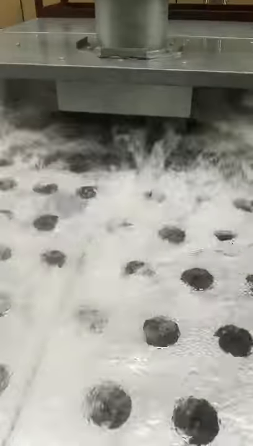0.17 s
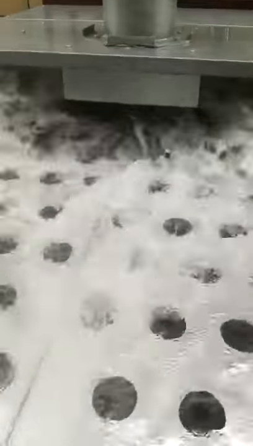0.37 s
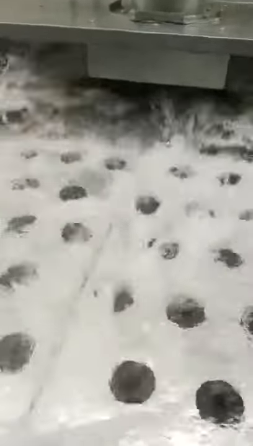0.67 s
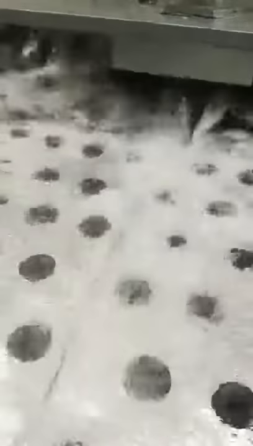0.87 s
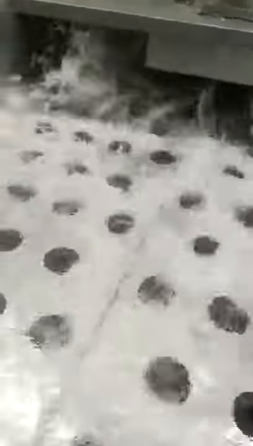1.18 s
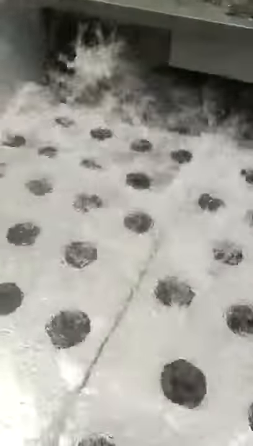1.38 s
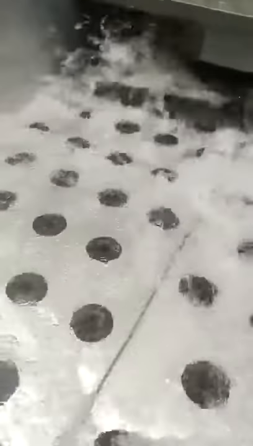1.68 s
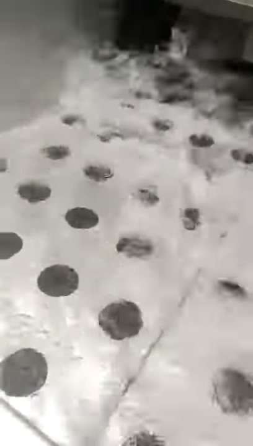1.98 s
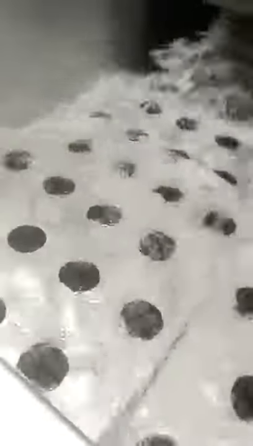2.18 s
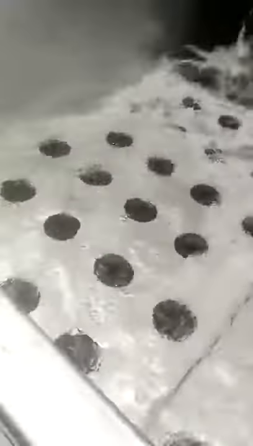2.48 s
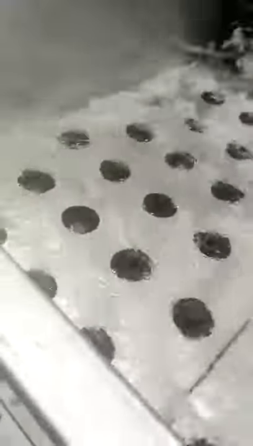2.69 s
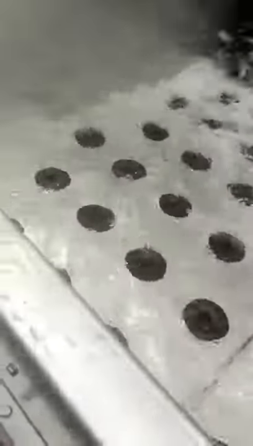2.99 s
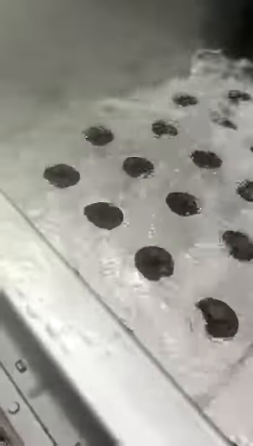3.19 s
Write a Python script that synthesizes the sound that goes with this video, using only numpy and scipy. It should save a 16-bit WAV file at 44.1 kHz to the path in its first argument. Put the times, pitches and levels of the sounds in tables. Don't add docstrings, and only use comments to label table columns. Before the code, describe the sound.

Turbulent water pours into a perforated metal basin, fading up quickly after a brief silence, then rushing steadily with foamy hiss, fizzing bubbles and low hollow rumble; close handheld stereo microphone, faint motor whine far off.

```python
import sys
import numpy as np
from scipy import signal
from scipy.fft import rfft, irfft, next_fast_len
from scipy.io import wavfile
from scipy.ndimage import uniform_filter1d

SR = 44100
rng = np.random.default_rng(int(sys.argv[2]) if len(sys.argv) > 2 else 0)


def makeup_ratio(level_db):
    decades = np.asarray(level_db, float) / 20
    return 10 ** decades


def wav_out(sig):
    wavfile.write(sys.argv[1], SR, np.round(np.clip(np.atleast_2d(sig).T, -1, 1) * 32767).astype(np.int16))


N = 147294

# [Hz, dB rms]
WHINE = [(4986.5, -62), (5090.7, -61), (5992, -63)]
# [s, dB]
CHURN = [(.45, -18.5), (.6, -16.5), (.8, -20), (1.0, -19.5), (1.15, -17), (1.3, -21), (1.55, -20),
         (1.75, -16), (1.95, -19.5), (2.2, -18.5), (2.38, -19), (2.55, -20.5), (2.8, -20.5), (3.0, -18),
         (3.33, -22.5)]
# [Hz, dB per Hz]
RUMBLE = [(20, -17), (34, -14), (44, -1), (68, -5.5), (130, -1.5), (185, -6.5), (340, -11.5), (500, -23)]
# [Hz, Hz, dB]
HOLLOW = [(84.4, 4.8, -28), (56, 8, -37), (138.9, 18, -33.5), (293.8, 19, -33.5), (254.3, 15.5, -36),
          (357, 14.6, -37.5)]
# [s, dB, Hz]
SPLASHES = [
    (.297, -23, 1500),
    (0.633, -27, 5200),
    (.752, -26, 4600),
    (1.859, -20.5, 3130),
]
# [s, dB]
FLOW = [(.45, 0.6), (.62, 1.6), (.7, 2), (.76, 0.9), (1.0, 1.5), (1.3, 1), (1.39, 1.6), (1.5, 1.1),
        (1.84, 0.7), (1.875, 3.7), (1.93, 1.1), (2.2, 0.44), (2.5, 0.6), (2.8, 0.9), (3.1, -0.2),
        (3.33, 1.4)]
# [Hz, dB per Hz]
LEFT_COLOUR = [(250, -4), (560, -1.5), (800, -5), (1520, 1.14), (2600, -8.5), (5300, -17.5), (9000, -14),
               (14400, -19.5)]
# [Hz, dB per Hz]
RIGHT_COLOUR = [(250, -14.5), (620, 0.5), (800, -4), (1300, -3), (2000, -10), (3600, -9.5), (6500, -14.5),
                (14400, -19.5)]
# [Hz, 0-1]
PORT_LIKENESS = [(300, 0.64), (620, 0.69), (800, 0.39), (1550, 0.6), (2250, 0.35), (3550, 0.33),
                 (4000, 0.04), (14400, 0.02)]
# [Hz, radians]
RIGHT_LEAD = [(250, 0), (620, 3.2), (1050, 6.7), (1750, 6.6), (2300, 9.2), (3800, 12.9), (5100, 21.3),
              (8200, 28)]

RUMBLE_DB, RUMBLE_LIKENESS, RUSH_DB = -19.5, 0.98, -23.5
FIZZ_FOLLOW, RUMBLE_FOLLOW = 0.95, 0.7
BUBBLES_PER_S, BUBBLE_SHARE, BUBBLE_SIZE_DB = 6000, 0.18, 2.5
LULLS_PER_S, LULL_DB = 45, -10
START_S, START_DB, FADE_S = 0.079, -20.5, 0.29


def evened(x):
    return x / np.sqrt(np.mean(x ** 2) + 1e-20)


def read(points, hz):
    f, value = np.transpose(points)
    return np.interp(np.log(hz + 1), np.log(f + 1), value)


def surge(curve, follow):
    s, db = np.transpose(curve)
    return makeup_ratio(follow * np.interp(np.arange(N) / SR, s, db - db.mean()))


def drift(low_hz, top_hz):
    t = np.arange(N) / SR
    waves = [np.sin(2 * np.pi * (f * t + rng.random())) / np.sqrt(f)
             for f in np.geomspace(low_hz, top_hz, num=24)]
    return evened(sum(waves))


def whine():
    t, out = np.arange(N) / SR, np.zeros(N)
    for hz, db in WHINE:
        level = makeup_ratio(db + 9 + 2.7 * drift(0.55, 3.2))
        out += level * np.sin(2 * np.pi * (hz * t + rng.random()))
    return out * makeup_ratio(np.array([[-6.0], [4.0]]))


def rumble():
    size = next_fast_len(N)
    hz = np.fft.rfftfreq(size, 1 / SR)
    common, spread = rfft(rng.standard_normal((2, N)), size)
    low_edge = np.minimum(hz / RUMBLE[0][0], 1) ** 2
    high_edge = np.minimum(RUMBLE[-1][0] / (hz + 1), 1) ** 4
    colour = makeup_ratio(read(RUMBLE, hz)) * high_edge * low_edge
    apart = np.sqrt(1 - RUMBLE_LIKENESS) * np.minimum(hz / 190, 2.2) * spread
    pair = irfft(colour * np.array([common + apart, common - apart]), size)[:, :N]
    out = makeup_ratio(RUMBLE_DB - 1.09) * evened(pair)
    for f, width, db in HOLLOW:
        ringing = rfft(rng.standard_normal(N), size) / (1 + (2 * (hz - f) / width) ** 2)
        out = out + makeup_ratio(db) * evened(irfft(ringing, size)[:N])
    return out * makeup_ratio(0.5 * drift(5, 13)) * surge(CHURN, RUMBLE_FOLLOW)


def blip(hz, cycles, glide):
    u = np.arange(0, 3 * cycles / hz, 1 / SR) * hz / cycles
    envelope = (1 - np.exp(-12 * u)) * np.exp(-2.5 * u)
    return evened(envelope * np.sin(2 * np.pi * cycles * (u + glide * u ** 2)))


def splashes():
    out, t = np.zeros(N + SR), np.arange(2000) / SR
    for start_s, db, hz in SPLASHES:
        at = round(start_s * SR)
        tone = blip(hz, 4.1, 0.05)
        out[at:at + len(tone)] += makeup_ratio(db - 2.0) * tone
        spray = np.diff(rng.standard_normal(len(t) + 1))
        out[at:at + len(t)] += makeup_ratio(db - 14.0 - 60 * t / 0.09) * spray
    return out[:N] * makeup_ratio(np.array([[-1.5], [1.5]]))


def bubbles():
    starts = rng.random((2, N)) < BUBBLES_PER_S / SR
    size = makeup_ratio(BUBBLE_SIZE_DB * np.minimum(rng.exponential(1, (2, N)), 5)) * starts
    kind, out = rng.integers(0, 30, (2, N)), np.zeros((2, N))
    for k, hz in enumerate(np.geomspace(450, 13000, num=30)):
        grain = blip(hz, 3.7 * rng.uniform(0.58, 1.2), 0.08)
        grain = grain[None] * hz / len(grain) ** 0.25 / 100
        out += signal.oaconvolve(size * (kind == k), grain, axes=1)[:, :N]
    return evened(out)


def foam(patchy_db, flicker_db):
    frames = N // 64 + 8
    a, b, c, d, patches = rng.standard_normal((frames, 129, 5)).T
    patches = uniform_filter1d(patches, size=5, axis=0)
    patches = evened(uniform_filter1d(patches, size=40, axis=1))
    flicker = rng.standard_normal((frames, 129)).T
    flicker = uniform_filter1d(flicker, size=70, axis=0)
    flicker = evened(uniform_filter1d(flicker, size=12, axis=1))
    z = np.array([a + 1j * b, c + 1j * d]) * makeup_ratio(patchy_db * patches + flicker_db * flicker)
    return evened(signal.istft(z, nperseg=256, noverlap=192)[1][:, :N])


def ports(pair):
    size = next_fast_len(N)
    hz = np.fft.rfftfreq(size, 1 / SR)
    direct, scattered = rfft(pair, size)
    same = np.clip(read(PORT_LIKENESS, hz), 0, 1)
    lead = np.exp(1j * np.interp(hz, *np.transpose(RIGHT_LEAD)))
    right = same * direct * lead + np.sqrt(1 - same ** 2) * scattered
    low_edge = np.minimum(hz / LEFT_COLOUR[0][0], 1) ** 2
    both = np.array([direct * makeup_ratio(read(LEFT_COLOUR, hz)), right * makeup_ratio(read(RIGHT_COLOUR, hz))])
    return irfft(low_edge * both, size)[:, :N]


def rush():
    pair = np.sqrt(1 - BUBBLE_SHARE) * foam(0.92, 0.84) + np.sqrt(BUBBLE_SHARE) * bubbles()
    level = makeup_ratio(RUSH_DB + 3.0 + 0.16 * drift(3.07, 13))
    return level * surge(FLOW, FIZZ_FOLLOW) * evened(ports(pair))


def scene():
    return whine() + rumble() + splashes() + rush()


def lulls(x):
    hz, t, z = signal.stft(x, SR, nperseg=1024)
    chance = LULLS_PER_S * t[1] / len(hz)
    seeds = (rng.random(z.shape[1:]) < chance) * (hz[:, None] > 2000)
    holes = uniform_filter1d(seeds * 20.0, size=4, axis=0)
    holes = uniform_filter1d(holes, size=5, axis=1)
    return signal.istft(z * makeup_ratio(LULL_DB * np.minimum(holes, 1)), SR, nperseg=1024)[1][:, :N]


def top_cut(x):
    return signal.sosfilt(signal.butter(12, 14290, fs=SR, output="sos"), x)


def record(dry):
    u = (np.arange(N) / SR - START_S) / FADE_S
    fade = (u > 0) * (makeup_ratio(START_DB) + (1 - makeup_ratio(START_DB)) * np.clip(u, 0, 1) ** 1.04)
    mix = lulls(dry) * fade
    return top_cut(mix)


dry = scene()
out = record(dry)
wav_out(out)
```